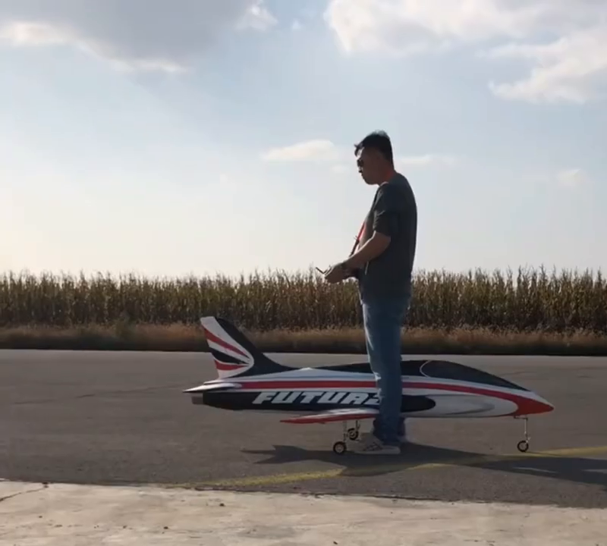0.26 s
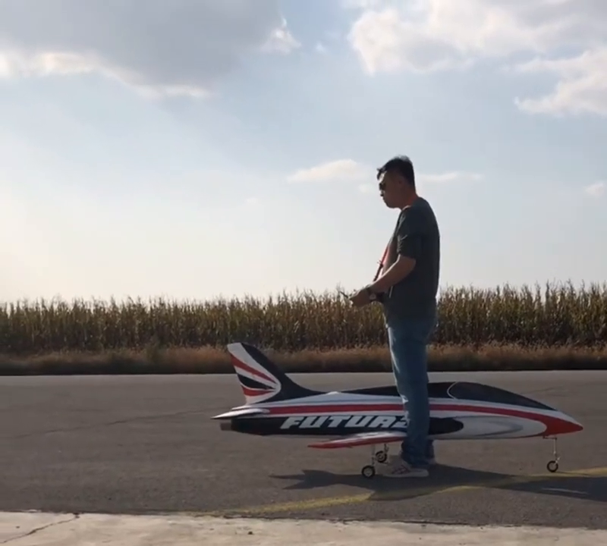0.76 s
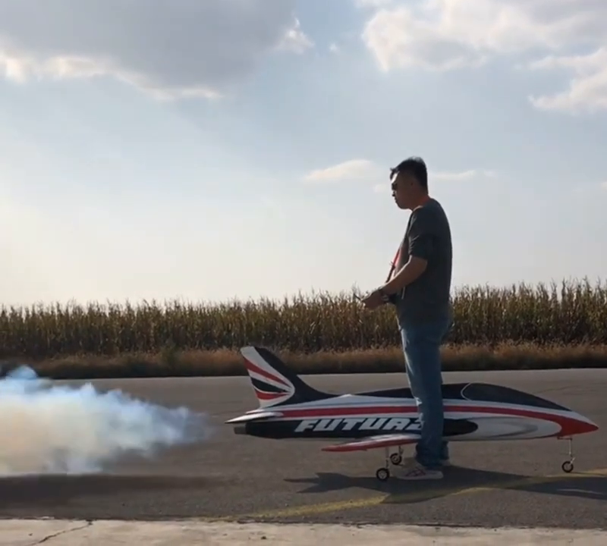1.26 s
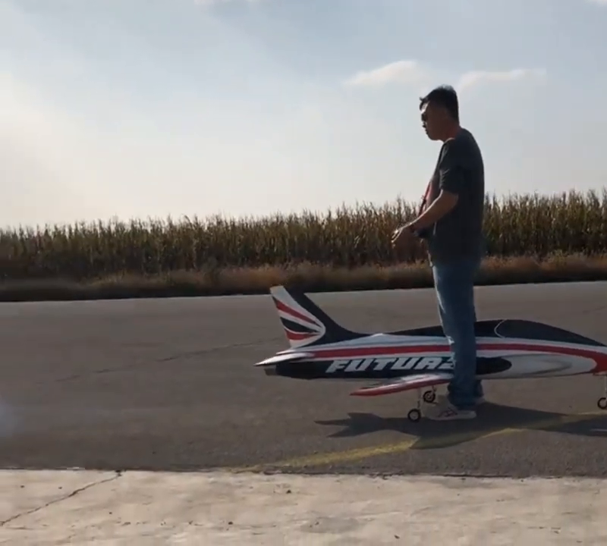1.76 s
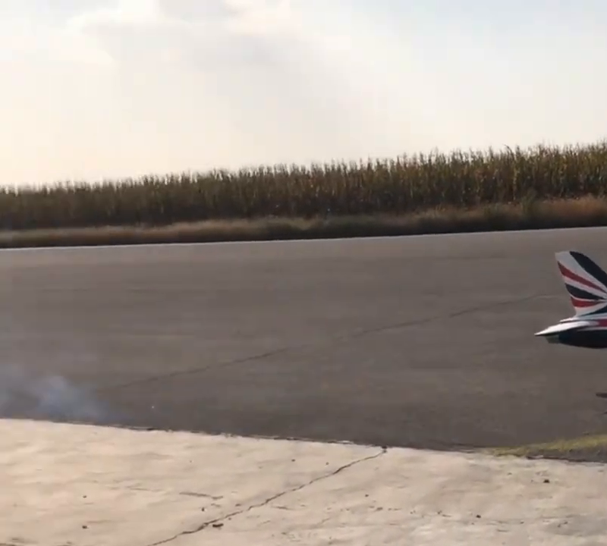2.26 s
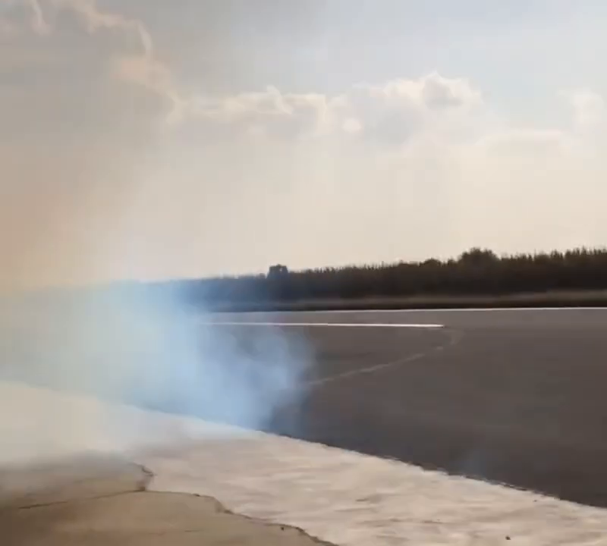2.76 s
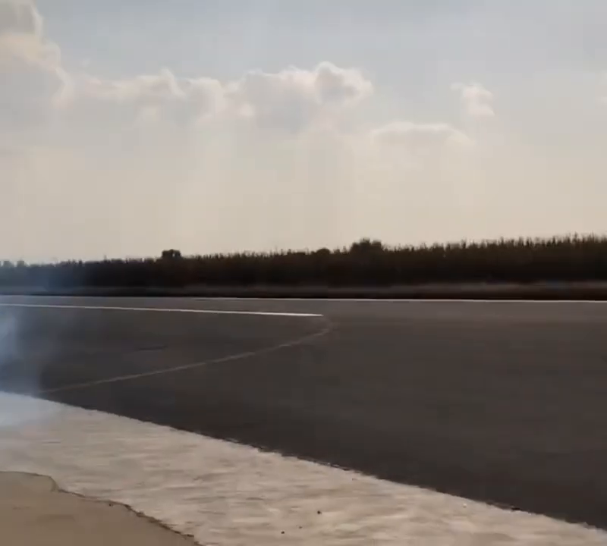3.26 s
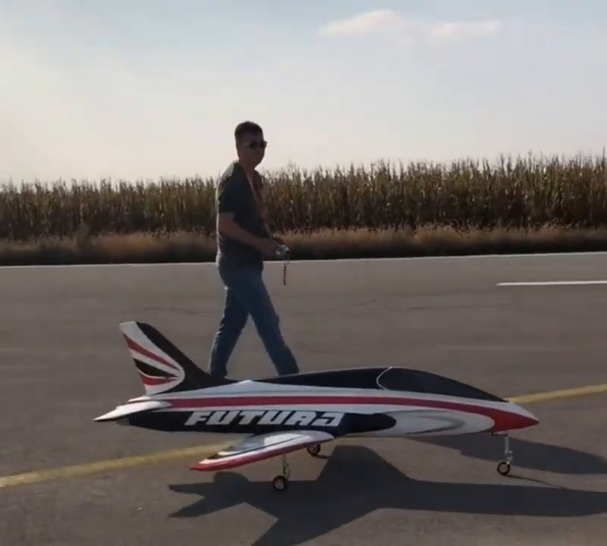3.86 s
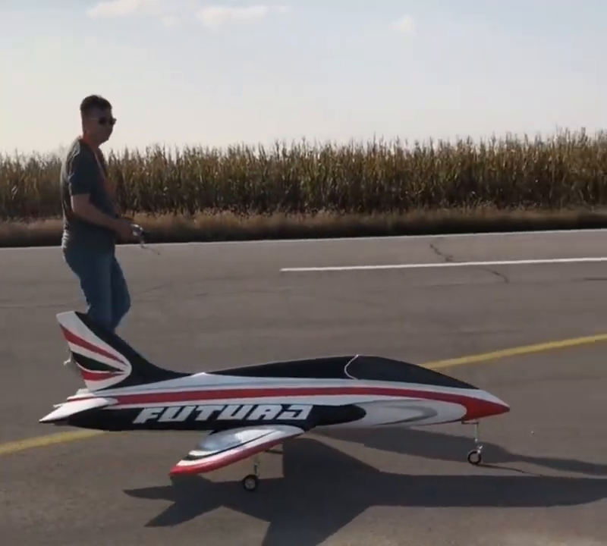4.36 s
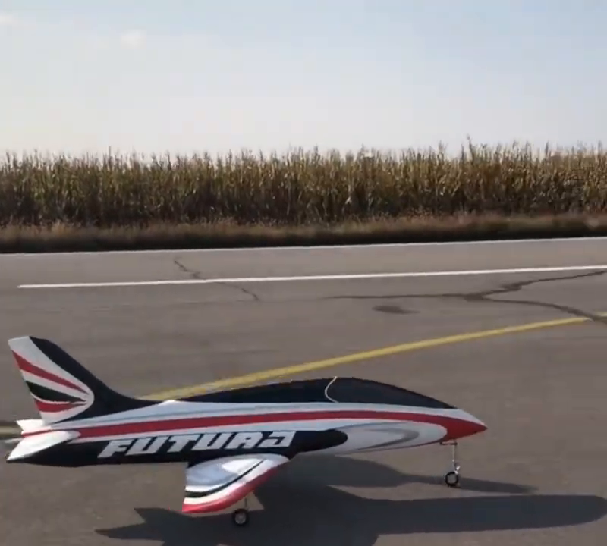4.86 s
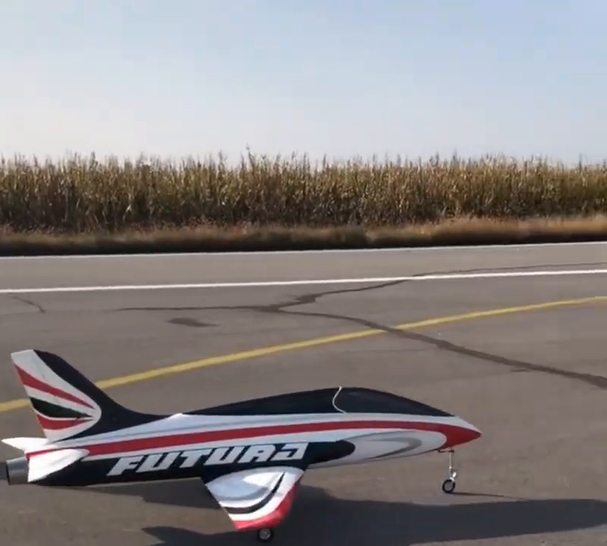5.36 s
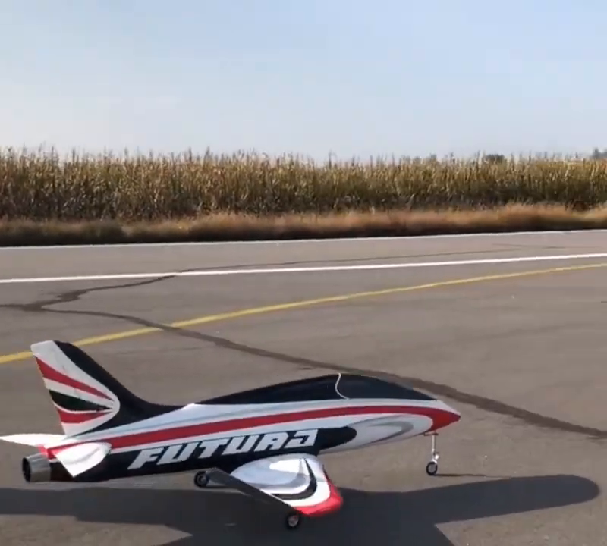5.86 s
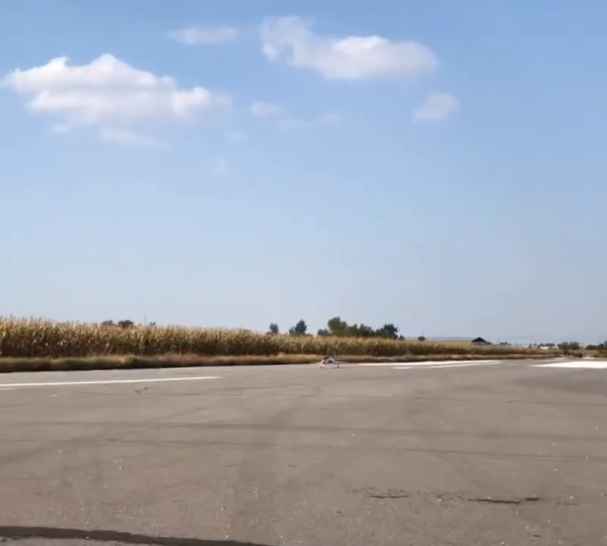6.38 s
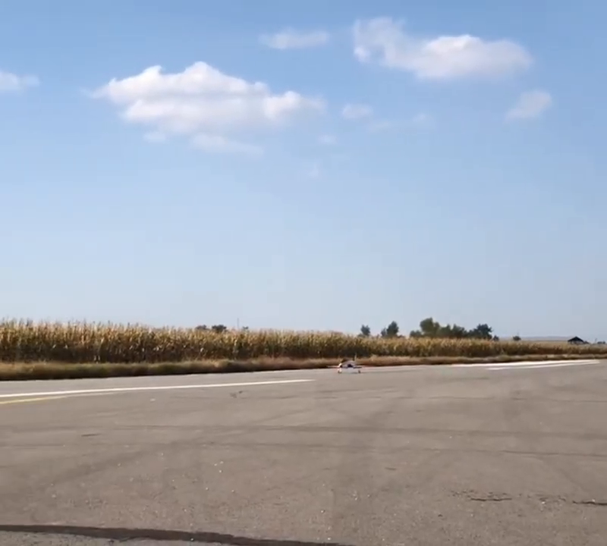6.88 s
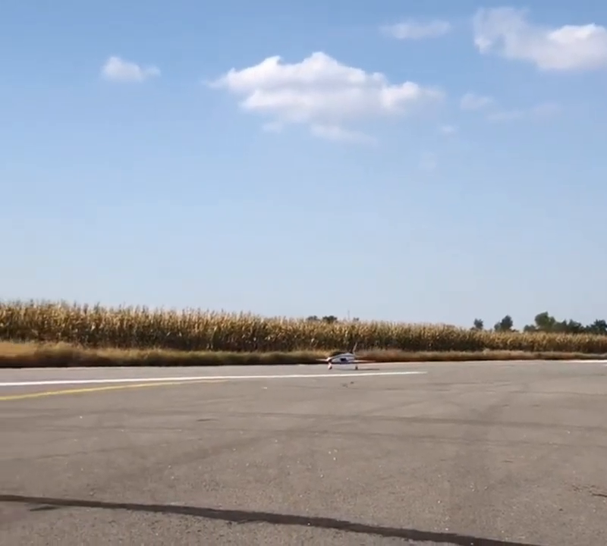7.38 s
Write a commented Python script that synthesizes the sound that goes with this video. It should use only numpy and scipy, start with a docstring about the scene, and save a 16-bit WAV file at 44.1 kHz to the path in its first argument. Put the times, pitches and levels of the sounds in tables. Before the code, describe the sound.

After a blip of distant jet rush and a short gap, a model jet engine runs hard close by, a loud hissing roar with a low howl rising near its end. A cut brings softer taxiing: a thin, very high whine sinks to idle over rush and rumble. Another cut leaves a duller, distant rush that grows as the jet rolls in along the open runway, with a gust thumping the microphone and a brief rasp.

```python
"""First comes a brief, distant rush: a model jet in the sky. Three more scenes follow, cut together:
the jet runs hard close by, taxis past while slowing to a whining idle, and rolls in along the runway.
The rush is swirling exhaust, heard directly and off the ground; the two paths cancel at some pitches,
and these notches slide as the jet moves. The compressor makes the main whine and the flame rumbles.
In the last two scenes, gusts of wind blow on the microphone."""
import sys
import numpy as np
from scipy import signal
from scipy.fft import rfft, irfft, next_fast_len
from scipy.io import wavfile

SR = 44100
rng = np.random.default_rng(int(sys.argv[2]) if len(sys.argv) > 2 else 0)


def unload_wav(signal):
    """Save mono or channel-first audio to the path in sys.argv[1] as 16-bit WAV at rate SR, clipped to [-1, 1]."""
    wavfile.write(
        sys.argv[1],
        SR,
        np.round(np.clip(np.atleast_2d(signal).T, -1, 1) * 32767).astype(np.int16),
    )


N = 336483
T = np.arange(N) / SR
FFT_SIZE = next_fast_len(N)
FFT_HZ = np.fft.rfftfreq(FFT_SIZE, 1 / SR)

# when each of the four scenes plays: start t/s, end t/s
SCENE_TIMES = [(0, .141), (.305, 3.277), (3.296, 6.067), (6.0865, 7.64)]

# tone colour of the wind, the rasp and the flame: f/Hz, relative level/dB
WIND_COLOUR = [(25, -36), (50, 0), (80, 1), (150, 1), (290, -6), (450, -18), (900, -59)]
RASP_COLOUR = [(1200, -30), (2400, 6), (3500, 5), (4600, -3), (7000, -27), (12000, -41)]
FLAME_COLOUR = [(35, -28), (70, -9.5), (110, -11), (160, 0), (240, 2), (360, -4.5), (460, -7.5),
                (580, -20.5), (720, -22), (860, -25), (1050, -31)]
# gusts on the microphone: start t/s, length/s, level/dB
WIND_GUSTS = [(3.64, 0.25, -34), (4.08, 1.46, -33.5), (4.86, 0.093, -32), (5.08, 0.093, -30),
              (5.55, .07, -29), (5.88, 0.1, -31), (7.187, 0.24, -17.5), (7.38, 0.028, -22.5),
              (7.53, .05, -30)]
# a rasp that swells as the jet rolls nearer: t/s, level/dB
RASP_LEVELS = [(7.0, -58), (7.3, -41), (7.38, -30), (7.48, -25), (7.56, -32), (7.63, -38)]
# a thin ring early in the run-up, then a low howl that rises in pitch: t/s, f/Hz, level/dB
THIN_RING = [(.3, 2345, -33), (1.3, 2333, -29), (1.7, 2260, -36), (2.0, 2200, -55)]
LOW_HOWL = [(1.9, 798, -43), (2.4, 877, -26), (2.8, 946, -24), (3.0, 977, -22.5), (3.277, 977, -24)]

# hums of the tailpipe: first f/Hz, idle f/Hz, width/Hz, first and idle relative level/dB
TAILPIPE_HUMS = [(160.4, 157, 21.4, -10.5, -7), (282.7, 312, 37, -4, -6.5), (556, 550, 25, -16, -12.5)]
# surges of the flame: start t/s, length/s, level/dB above steady
FLAME_SURGES = [(3.32, 0.49, 2), (5.52, 0.089, 4.2), (5.81, 0.05, 3.5)]

# how much whine is scattered as the hot exhaust turns toward the microphone: t/s, relative level/dB
WHINE_SCATTER = [(3.3, -6), (4.5, -10), (5.3, -14), (5.6, -13), (6.04, -8)]
# weaker tones around the whine: multiple of its pitch, offset f/Hz, first level/dB, idle level/dB
SIDE_TONES = [(.5, -0.5, -36.5, -45.5), (1.5, 0, -44, -43), (1, 3930, -34, -48), (1, -3930, -50, -53)]
# a brief whistle an octave below the idling whine: start t/s, length/s, level/dB
IDLE_WHISTLE = [(5.5, 0.17, -40)]

# how the exhaust changes in each scene:
# t/s, relative level/dB, treble tilt/(dB per octave), delay of the ground echo/ms
SKY_PATH = [(0.0, 0, 1.5, 0.76), (0.141, -2.5, 0.2, 0.79)]
RUN_UP_PATH = [(0.305, 1, -0.65, 0.17), (1.3, -1, -0.15, 0.18), (1.9, -0.022, 0.29, 0.23),
               (2.35, -1.1, 0.46, 0.28), (2.72, 0.3, 0.025, 0.338), (3.0, 1.2, -0.3, 0.34),
               (3.2, -0.66, 0.57, 0.32)]
TAXI_PATH = [(3.297, -2.5, 0.48, 0.32), (4.5, -2.5, 0.04, 0.385), (5.3, 2.5, -0.9, 0.46),
             (6.067, 3.5, 0.4, 0.51)]
ROLL_IN_PATH = [(6.086, -3.3, -0.3, 0.048), (6.27, -1, -0.9, 0.046), (6.5, -2, 0.1, 0.053),
                (6.66, -2, -1.4, 0.045), (6.92, -1.3, 0.77, 0.049), (7.25, 2, -0.028, 0.05),
                (7.43, 5, 1.6, 0.048)]
# basic tone colour of the exhaust in each scene: f/Hz, level/dB in a band 1 Hz wide
SKY_COLOUR = [(35, -72), (100, -66), (220, -58), (400, -56), (1000, -62.5), (1400, -66), (3000, -70.5),
              (6000, -85), (10000, -103), (15000, -117)]
RUN_UP_COLOUR = [(35, -103), (90, -68), (150, -54.5), (350, -54.5), (800, -48), (1300, -48), (1750, -46),
                 (2050, -50.5), (2400, -56), (4300, -55), (6700, -55), (7700, -56.5), (12000, -60.5),
                 (15200, -62.5)]
TAXI_COLOUR = [(100, -93), (350, -64.5), (800, -55), (1100, -57.5), (1500, -57.5), (2400, -66),
               (3400, -66.5), (4400, -66.5), (6000, -70), (7000, -72), (8000, -70), (11000, -76.5),
               (15200, -74.5)]
ROLL_IN_COLOUR = [(35, -81), (90, -71), (150, -65), (300, -62.5), (500, -60), (650, -60.5), (800, -54.5),
                  (1250, -56.5), (1800, -60.5), (2300, -69.5), (3800, -76.5), (6500, -79.5), (10000, -85),
                  (15200, -99)]
# narrow resonances that boost or hollow out the rush: f/Hz, width/Hz, change of level/dB
SKY_RESONANCES = [(950, 120, 4), (1250, 200, 5), (9700, 200, 14)]
RUN_UP_RESONANCES = [(244, 48, 3.5), (299, 37, -4), (506, 98, 2.5), (688, 110, -2.5), (783, 64, 4.5),
                     (1040, 34, 2.5), (1220, 47, 4), (2050, 140, -2.5), (2420, 360, 4), (3136, 64, 2),
                     (6830, 430, 3)]
TAXI_RESONANCES = [(566, 63, 3.5), (740, 73, -1.5), (848, 46, 5), (1120, 110, 3.5), (2370, 190, 2.5),
                   (3500, 220, 4.5), (6140, 250, 5.5), (7800, 330, 1)]
ROLL_IN_RESONANCES = [(159, 35, 2.5), (343, 52, 4.5), (530, 77, 3.5), (780, 50, 2.5), (935, 51, -1.5),
                      (1300, 43, 5.5), (1420, 32, -5.5)]


def undb(db):
    """Turn decibels into a gain to multiply by."""
    return 10 ** (np.asarray(db) / 20)


def curves(rows, t):
    """Join the values in each column of a table with straight lines in time."""
    times, *columns = np.transpose(rows)
    return [np.interp(t, times, column) for column in columns]


def colour_gain(colour, f):
    """The gain of a tone colour at the frequencies f."""
    hz, db = np.transpose(colour)
    return undb(np.interp(np.log(f + 1), np.log(hz), db))


def filtered(x, gains):
    """Turn each frequency in a sound up or down by its own gain."""
    return irfft(rfft(x, FFT_SIZE) * gains, FFT_SIZE)[:N]


def noise(colour):
    """Noise with a given tone colour and a typical size (rms) of 1."""
    y = filtered(rng.standard_normal(FFT_SIZE), colour_gain(colour, FFT_HZ))
    return y / np.std(y)


def wander(rate):
    """A smooth random curve of typical size 1 that changes about rate times a second."""
    y = filtered(rng.standard_normal(FFT_SIZE), np.exp(-(FFT_HZ / rate) ** 2))
    return y / np.std(y)


def swells(rows, attack_s, release_s):
    """The summed gain of events that rise, hold and die away."""
    gain = 0
    for start, length, db in rows:
        rise = np.clip((T - start) / attack_s, 0, 1)
        fall = np.exp(-np.maximum(T - start - length, 0) / release_s)
        gain = gain + undb(db) * rise * fall
    return gain


def hum(hz, width_hz):
    """A resonance stirred by swirling air: a narrow band of noise around a moving pitch."""
    phase = 2 * np.pi * np.cumsum(hz) / SR
    return wander(width_hz) * np.cos(phase) + wander(width_hz) * np.sin(phase)


def scene_gate(index, fade_s, tail_db=-27, tail_s=0.012):
    """Fade one scene in quickly, then cut it off with a faint, brief tail."""
    start, end = SCENE_TIMES[index]
    fade_in = np.clip((T - start) / fade_s, 0, 1)
    cut = np.clip((end - T) / 0.0011, 0, 1)
    tail = undb(tail_db) * np.exp(-np.maximum(T - end, 0) / tail_s)
    return fade_in * np.maximum(cut, tail)


def hush(level_db=-84.5):
    """A very faint, low hush behind everything."""
    return undb(level_db) * noise([(30, 2), (300, -3), (2000, -20), (15000, -40)])


def wind(breeze_db=-55, tumble_db=2, thump_above_db=-22, thumps_per_s=36, thump_hz=171):
    """Air tumbles over the microphone; the strongest gusts shed swirls that thump unevenly."""
    strength = undb(breeze_db) + swells(WIND_GUSTS, attack_s=0.041, release_s=0.047)
    out = noise(WIND_COLOUR) * strength * undb(tumble_db * wander(6.3))
    chances = rng.standard_normal((int(T[-1] * thumps_per_s), 3))
    for k, (late, pitch, size) in enumerate(chances):
        when = (k + late / 2) / thumps_per_s
        gust = np.interp(when, T, strength)
        if gust > undb(thump_above_db):
            cycles = (T - when) * thump_hz * np.exp(0.21 * pitch)
            peak = gust * undb(8.5 + 2 * size)  # about 8.5 dB above the gust
            out = out + peak * np.cos(2 * np.pi * cycles) * np.exp(-(cycles / .5) ** 2)
    return out


def rasp():
    """The harsh upper middle of the approaching exhaust swells for a moment."""
    return noise(RASP_COLOUR) * undb(curves(RASP_LEVELS, T)[0])


def howl(rows, width_hz):
    """A narrow band of the roar stands out and glides in pitch."""
    hz, db = curves(rows, T)
    return hum(hz, width_hz) * undb(db)


def extra_speed(slowing_s=2.31, easing=3.2):
    """The shaft's speed above idle: 1 as the taxi scene opens, easing down to 0."""
    taxi_start = SCENE_TIMES[2][0]
    return np.clip(1 - (T - taxi_start) / slowing_s, 0, 1) ** easing


def settle(first, at_idle, near_idle=.07):
    """Move a value to its idle setting, mostly once the extra speed is down to about near_idle."""
    return first + (at_idle - first) * np.exp(-extra_speed() / near_idle)


def burner(level_db=-23, throb_db=1.9):
    """The flame rumbles, throbs and makes the tailpipe hum; the hums shift as the engine settles."""
    rumble = undb(-3) * noise(FLAME_COLOUR)
    for first_hz, idle_hz, width_hz, first_db, idle_db in TAILPIPE_HUMS:
        rumble = rumble + hum(settle(first_hz, idle_hz), width_hz) * undb(settle(first_db, idle_db))
    surge = np.maximum(1, swells(FLAME_SURGES, attack_s=0.027, release_s=.12))
    return rumble * surge * undb(level_db + throb_db * wander(39))


def fading_tone(hz, fading_db, hiss_db=-13):
    """One thin, high tone that fades in and out and blurs to nearby pitches."""
    pure = np.exp(2j * np.pi * np.cumsum(hz) / SR) * (hz < SR / 2)  # silent if too high for SR
    fading = undb(fading_db * np.minimum(wander(24), 1.3))
    blur = wander(113) + 1j * wander(90)
    hiss = undb(hiss_db) * (wander(350) + 1j * wander(350))
    scatter = undb(curves(WHINE_SCATTER, T)[0])
    return np.sqrt(2) * np.real(fading * (1 + scatter * (blur + hiss)) * pure)


def whine(idle_hz=10083, above_idle_hz=6660, waver_hz=8, drift_db=2.5):
    """The compressor's tone sinks as the shaft slows; weaker tones come and go around it."""
    speed = extra_speed()
    hz = idle_hz + above_idle_hz * speed + waver_hz * wander(31)
    main_tone = fading_tone(hz, fading_db=4) * undb(settle(first=-22, at_idle=-24.5))
    whistle = fading_tone(hz / 2, fading_db=0) * swells(IDLE_WHISTLE, attack_s=.1, release_s=.12)
    out = main_tone + whistle
    for multiple, offset_hz, first_db, idle_db in SIDE_TONES:
        db = idle_db + (first_db - idle_db) * speed + drift_db * np.minimum(wander(4.1), 1)
        out = out + fading_tone(multiple * hz + offset_hz, fading_db=4.5) * undb(db)
    return out


def resonate(x, resonances):
    """Resonances add bell-shaped boosts and hollows to the tone colour."""
    bells_db = sum(db / (1 + (2 * (FFT_HZ - hz) / width) ** 2) for hz, width, db in resonances)
    return filtered(x, undb(bells_db))


def reflect(x, echo_db=-23, shortest_s=.003, longest_s=.03, count=8):
    """Weak echoes off the jet's body and things nearby put a fine ripple on the tone colour."""
    delays = (SR * rng.uniform(shortest_s, longest_s, count)).astype(int)
    gain = undb(echo_db)
    echoes = sum(np.pad(x, (delay, 0))[:N] for delay in delays)
    return (x + gain * echoes) / np.sqrt(1 + count * gain ** 2)


def exhaust(path, colour, resonances, ground_gain, blur_cycles, flutter_db, crackle_db, treble_hz=1000):
    """The rush of swirling exhaust, heard directly and as an echo off the ground."""
    frames = dict(fs=SR, nperseg=1024, noverlap=768)
    f, t, swirls = signal.stft(rng.standard_normal(N), **frames)
    f = f[:, None]
    level_db, tilt_db, delay_ms = curves(path, t)
    # the treble is beamed to the side of the nozzle and fades with distance
    octaves_up = np.log2(np.maximum(f / treble_hz, 1))
    gain = colour_gain(colour, f) * undb(level_db + tilt_db * octaves_up)
    # the echo cuts notches where it arrives out of step with the direct sound
    cycles_late = f * delay_ms / 1000
    # the exhaust is a spread-out source, so each higher notch is shallower
    echo_gain = ground_gain / (1 + (cycles_late / blur_cycles) ** 2)
    both_paths = 1 + echo_gain * np.exp(-2j * np.pi * cycles_late)
    _, rush = signal.istft(swirls * gain * both_paths, **frames)
    rush = rush[:N] * np.sqrt(SR / 2)  # makes the colour's levels count per 1 Hz band
    rush = reflect(resonate(rush, resonances))
    # large swirls make the rush flutter, small ones roughen it
    return rush * undb(flutter_db * wander(25) + crackle_db * wander(380))


def scene():
    """The four scenes in turn over a faint hush, the same in both ears."""
    sky = exhaust(SKY_PATH, SKY_COLOUR, SKY_RESONANCES,
                  ground_gain=.7, blur_cycles=1.4, flutter_db=-1, crackle_db=0)
    run_up = exhaust(RUN_UP_PATH, RUN_UP_COLOUR, RUN_UP_RESONANCES,
                     ground_gain=0.78, blur_cycles=2.1, flutter_db=1, crackle_db=0.78)
    taxi = exhaust(TAXI_PATH, TAXI_COLOUR, TAXI_RESONANCES,
                   ground_gain=0.94, blur_cycles=1.13, flutter_db=0.46, crackle_db=0.5)
    roll_in = exhaust(ROLL_IN_PATH, ROLL_IN_COLOUR, ROLL_IN_RESONANCES,
                      ground_gain=0.61, blur_cycles=0.93, flutter_db=0.65, crackle_db=0)
    howls = howl(LOW_HOWL, width_hz=49) + howl(THIN_RING, width_hz=120)
    gusts = wind()
    mono = hush()
    mono += sky * scene_gate(0, fade_s=0.00051)
    mono += (run_up + howls) * scene_gate(1, fade_s=0.0016)
    mono += (taxi + whine() + burner() + gusts) * scene_gate(2, fade_s=0.015)
    mono += (roll_in + rasp() + gusts) * scene_gate(3, fade_s=0.0012)
    return np.array([mono, mono])


def record(dry):
    """The recorder rounds off the tallest peaks and cuts the highest treble."""
    ceiling, top_hz = .86, 15600
    rounded = dry / (1 + (dry / ceiling) ** 8) ** (1 / 8)
    low_pass = signal.ellip(12, .1, 80, top_hz, fs=SR, output="sos")
    return signal.sosfilt(low_pass, rounded)


dry = scene()
out = record(dry)
unload_wav(out)
```